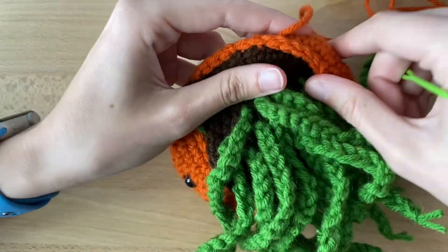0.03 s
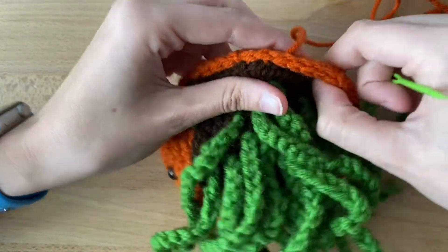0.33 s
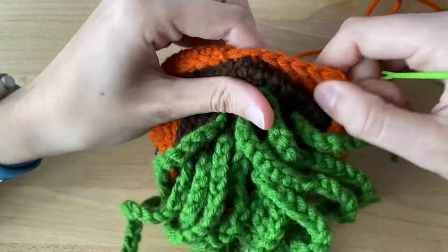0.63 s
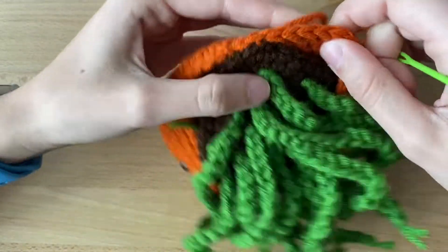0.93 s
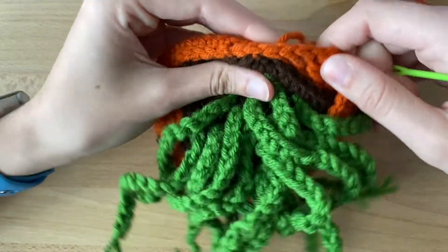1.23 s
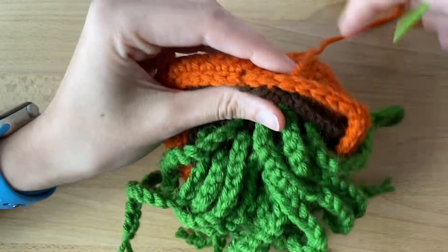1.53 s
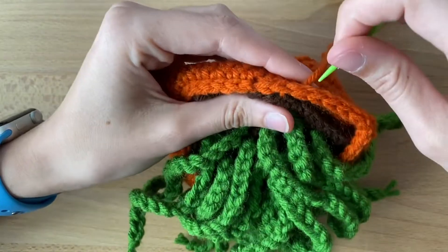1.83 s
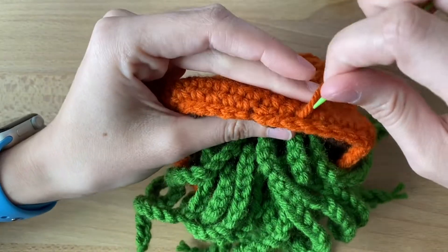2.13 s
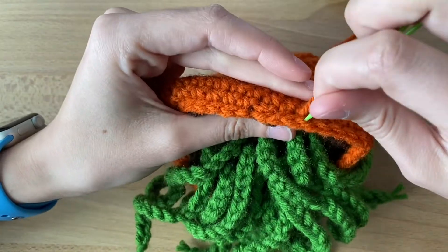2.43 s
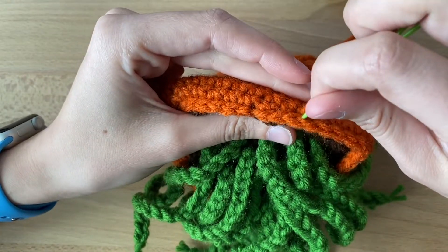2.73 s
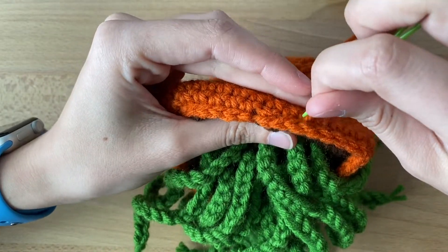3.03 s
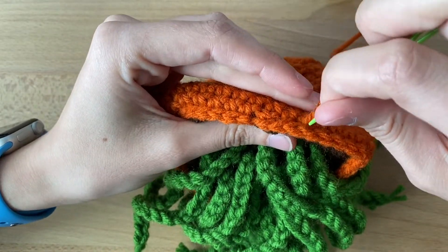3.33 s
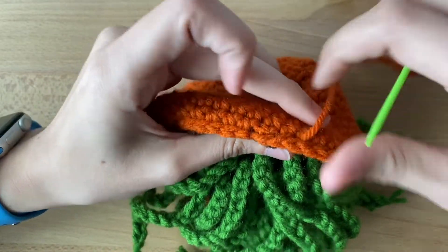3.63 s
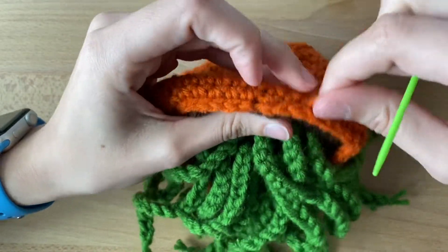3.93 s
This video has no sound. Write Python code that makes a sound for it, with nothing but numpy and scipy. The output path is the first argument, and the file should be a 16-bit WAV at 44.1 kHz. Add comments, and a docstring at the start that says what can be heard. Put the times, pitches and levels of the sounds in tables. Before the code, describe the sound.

Soft, close rubbing of yarn comes in small bursts during hand sewing indoors, with light needle ticks and a brief swish of pulled thread. After a lull the rustling resumes, while a low rumble and fading engine hum lie underneath.

```python
"""Sewing a crocheted toy

Hands sew with a plastic needle at a table, close to two microphones. Yarn rubs on yarn and skin in a
fine crackle, a strand is drawn through with a rasp and a bright swish, and the needle ticks.
Behind them lie a low room rumble and a muffled drone, like an engine outdoors, that sags and fades."""
import sys
import numpy as np
from scipy import signal
from scipy.fft import rfft, irfft
from scipy.io import wavfile
from scipy.ndimage import uniform_filter1d

SR = 44100
rng = np.random.default_rng(int(sys.argv[2]) if len(sys.argv) > 2 else 0)


def put_to_file(sound):
    """Save the sound as 16-bit audio at rate SR, in the file named by the first command-line argument."""
    columns = np.atleast_2d(sound).T  # one column per channel
    safe = np.clip(columns, -1, 1)
    whole_steps = np.round(safe * 32767)
    wavfile.write(sys.argv[1], SR, whole_steps.astype(np.int16))


N = 176400

# how hard the yarn rubs (time [s], relative level [dB], relative treble [dB])
RUB_MOTION = [(0.01, -71.5, -8), (0.08, -78.5, -6), (0.11, -70.5, -11.5), (0.15, -82, -1.5),
              (0.22, -86.5, -1.5), (0.25, -71.5, -6.5), (0.29, -72, -4.5), (0.32, -78.5, -7),
              (0.4, -72.5, -5), (0.45, -76.5, -5.5), (0.5, -71.5, -7), (0.63, -77.5, -8.5),
              (0.67, -69, -4.5), (0.75, -83, -4.5), (0.84, -73, -4), (0.92, -79.5, -5.5), (1.05, -78, -2),
              (1.07, -71, -5), (1.13, -78.5, -2), (1.32, -73.5, -6), (1.34, -72.5, -1), (1.4, -86.5, -9),
              (1.47, -89.5, -3.5), (1.54, -83, -3), (1.57, -75, 2.5), (1.59, -73.5, 5.5), (1.63, -84.5, 0),
              (1.66, -89, 3), (1.68, -81, -7), (1.69, -90, -9), (1.72, -94, -8), (1.83, -89.5, -5),
              (1.94, -80.5, -7), (2.0, -83, -1), (2.08, -80, -7.5), (2.14, -91, -8.5), (3.42, -91, -7.5),
              (3.48, -80.5, -3.5), (3.54, -90.5, -5), (3.58, -87, -14), (3.69, -77.5, 2),
              (3.72, -83.5, -3.5), (3.76, -85, -4), (3.79, -74.5, -1.5), (3.82, -82.5, -3), (3.87, -79, -1),
              (3.92, -88.5, -4), (3.98, -85, -5)]
# tone colour of rubbing yarn (frequency [Hz], relative level [dB])
YARN_COLOUR = [(150, -12.5), (400, -0.5), (700, 4), (1100, -2), (1800, -0.5), (2700, 0.5), (4000, 0),
               (5600, -2), (7200, 1), (10000, -1), (13000, -2.5), (16000, -4.5)]
# scrapes and swishes (loudest at [s], half length [s], centre [Hz], width [Hz], level [dB])
SCRAPES = [(0.278, .015, 3200, 1200, -70.5), (0.281, 0.027, 750, 500, -71.5),
           (0.55, 0.061, 2630, 1500, -81), (0.669, 0.015, 2570, 900, -77), (0.667, .04, 786, 400, -76),
           (.85, 0.046, 2830, 1000, -80.5), (1.588, 0.026, 14800, 3500, -64),
           (2.065, 0.038, 3200, 700, -81), (2.076, .08, 1960, 250, -86), (2.948, 0.017, 7500, 3000, -87),
           (2.951, .018, 14500, 3033, -84), (3.11, 0.017, 2300, 600, -93), (3.457, .025, 6580, 2500, -90),
           (3.485, 0.0021, 11800, 3000, -73.5), (3.593, 0.027, 3830, 1090, -87.5),
           (3.645, 0.027, 2980, 1300, -79.5), (3.7, 0.055, 2380, 695, -83),
           (3.792, 0.023, 2500, 1200, -78.5), (3.86, 0.019, 1680, 220, -81), (3.867, .03, 5530, 1500, -80)]
# the strand sliding through the stitches (time [s], level [dB])
STRAND_LEVEL = [(1.2, -100), (1.28, -83), (1.41, -91), (1.46, -81.5), (1.6, -82.5), (1.66, -79),
                (1.71, -78), (1.738, -79), (1.76, -91), (1.95, -91), (2.07, -89), (2.2, -99), (2.3, -110)]
# tone colour of its rasp (frequency [Hz], relative level [dB])
STRAND_COLOUR = [(500, -28), (1000, -15), (1400, -15), (1600, 3), (1750, -10), (1930, 2), (2200, -20.5),
                 (4000, -30)]
# needle and fingernail ticks (time [s], peak level [dB])
TICKS = [(.279, -56), (.284, -59), (1.274, -58), (1.3368, -46.5), (1.3402, -57), (1.349, -62), (1.423, -71),
         (1.673, -62.5), (1.776, -67), (2.284, -71), (3.106, -73), (3.635, -66), (3.787, -66)]
# the notes in a tick (frequency [Hz], relative level [dB], time to fade by 60 dB [s])
TICK_NOTES = [(620, -12, .06), (790, -4, .024), (980, -4, .015), (1260, -7, .016), (1550, 0, .017),
              (1830, 0, .017), (3100, -6, .006), (3700, -8, .006), (5100, -3, .01), (7200, -6, .005)]
# how alike the hands sound in the two microphones (frequency [Hz], likeness [0-1])
HAND_LIKENESS = [(300, 0.55), (1000, 0.34), (2800, .78), (5500, 0.58), (7000, 1), (16000, 1)]
# how much louder they are on the left (frequency [Hz], left minus right [dB])
HAND_BALANCE = [(300, 4), (700, 9), (2800, 3), (5500, 5.5), (6600, 0), (16000, 0)]
# how far the left wave runs ahead of the right (frequency [Hz], phase [radians])
HAND_PHASE = [(100, 0), (1200, 0), (2800, .8), (4000, .3), (7100, 0), (9100, -3.14), (10900, -6.2),
              (11600, -6.4), (13350, -9.42), (15200, -12.5), (16000, -12.57)]
# the engine's deep note (time [s], pitch [Hz], level [dB])
ENGINE_NOTE = [(0, 48.83, -42.5), (.35, 49.34, -42.5), (.7, 49.52, -43.5), (1.1, 49.02, -46.5),
               (1.5, 47.96, -57), (2, 47.53, -55), (2.5, 47.7, -55.5), (3, 46.43, -59), (3.4, 47.83, -77),
               (4, 48.3, -63.5)]
# its higher tones (loudest at [s], half length [s], pitch [Hz], glide [Hz/s], level [dB], waver [Hz])
ENGINE_TONES = [(0.616, 0.27, 134.5, -2, -52, 1.34), (1.22, 0.2, 131, -1.5, -58, 4.1),
                (.25, 0.31, 205, -7.5, -53, 1.16), (.35, 0.65, 272, -17.5, -61.5, 4.92),
                (0.377, 0.29, 243, -5.5, -61, 6), (1.01, 0.138, 243, -9.5, -50, 3),
                (0.91, 0.089, 210, 0, -56.5, 5.1), (1.178, 0.36, 226, -3.5, -57, 2.2),
                (1.46, .1, 240, -8.5, -53.5, 2.01), (1.655, .25, 63, -1, -56, 3),
                (0.24, 0.39, 475, -5, -70, 1.54), (0.544, 0.27, 335, -10.5, -68, 3.95),
                (3.2, 1, 252.5, -3, -60, 0.61), (2.8, .15, 250, 3.5, -57.5, 4.92),
                (3.6, 0.48, 270, -1, -72.5, 2), (2.65, .35, 372, 0.5, -72, 12), (3.6, .35, 134, 0, -61, 4)]
# tone colours of engine rumble, room rumble and hiss (frequency [Hz], relative level [dB])
ENGINE_COLOUR = [(20, -12.5), (40, -8), (62, 2.5), (85, -7.5), (130, -6), (170, -12), (250, -13),
                 (320, -13.5), (400, -18), (520, -25), (800, -34.5), (1300, -47), (3000, -86)]
ROOM_COLOUR = [(20, -18), (32, -14), (45, -6.5), (58, 1.5), (72, -2), (90, -8.5), (108, -9.5), (127, -4),
               (150, -8), (180, -10.5), (215, -12.5), (255, -10.5), (295, -17), (370, -21), (450, -32),
               (560, -33), (750, -43.5), (1000, -49.5), (1500, -58.5), (4000, -93)]
HISS_COLOUR = [(300, 7), (700, 16.5), (1100, 8.5), (2000, 6), (3500, -1.5), (6000, -9), (8000, -12),
               (10000, -14.5), (13000, -17), (14200, -22), (16000, -23)]
# loudness of the two rumbles (time [s], level [dB])
ENGINE_LEVEL = [(0, -55), (.35, -54), (.8, -56), (1.25, -54), (1.5, -57.5), (2.2, -61.5), (3, -72.5),
                (4, -83)]
ROOM_LEVEL = [(0, -47), (1.5, -59.5), (2.3, -53), (2.8, -54.5), (3.2, -55.5), (4, -56)]
# how alike the background sounds in the two microphones (frequency [Hz], likeness [0-1])
ROOM_LIKENESS = [(30, 1), (70, 0.95), (140, 0.94), (260, 0.61), (450, 0.1), (800, 0.02), (2000, 0),
                 (5000, 0.4), (7000, 0.9), (16000, .95)]


def rubbing(dull_hz=4500, bright_hz=11000, boost_db=3.5, treble_boost_db=5):
    """Yarn crackles as the hands move; a tight, fast strand sounds brighter."""
    hz, times, spectrum = signal.stft(fibres(), SR, nperseg=256)
    level_db, treble_db = over_time(RUB_MOTION, times)
    treble_share = np.clip(np.log((hz + 1) / dull_hz) / np.log(bright_hz / dull_hz), 0, 1)[:, None]
    # random patches of pitch and time are about 1 dB louder or softer
    patches = uniform_filter1d(rng.standard_normal(spectrum.shape), size=7, axis=0)
    patches_db = unit(uniform_filter1d(patches, size=10, axis=1))
    spectrum *= amp(boost_db + level_db + treble_share * (treble_db + treble_boost_db) + patches_db)
    flutter = amp(wander(rate_hz=45))
    return signal.istft(spectrum, SR, nperseg=256)[1][:, :N] * flutter


def fibres(snags_per_s=2500, spread_db=1.5, snag_share=0.36):
    """Yarn fibres slide past each other: countless tiny slips, with larger snags among them."""
    snags = (rng.random((2, N)) < snags_per_s / SR) * rng.choice([-1, 1], (2, N))
    snags = snags * amp(spread_db * np.minimum(rng.exponential(1, (2, N)), 5))
    slips = rng.standard_normal((2, N))
    friction = np.sqrt(snag_share) * unit(snags) + np.sqrt(1 - snag_share) * slips
    return stereo(friction, YARN_COLOUR, HAND_LIKENESS)


def scrapes(t, grit_db=2):
    """Tight yarn scrapes over a fingertip or the needle and rings in one broad band each time."""
    hz = np.fft.rfftfreq(N, 1 / SR)
    friction = rfft(fibres())
    out = np.zeros((2, N))
    for peak_s, half_s, centre_hz, width_hz, db in SCRAPES:
        resonance = 1 / (1 + 2j * (hz - centre_hz) / (1.33 * width_hz)) ** 2
        swell = amp(db) * np.exp(-((t - peak_s) / half_s) ** 2)
        out += swell * unit(irfft(friction * resonance, N))
    return out * amp(grit_db * wander(rate_hz=150))


def strand(t, judder_db=2):
    """The twisted strand judders through the stitches with a narrow rasp."""
    rasp = stereo(rng.standard_normal((2, N)), STRAND_COLOUR, HAND_LIKENESS)
    return rasp * amp(over_time(STRAND_LEVEL, t)[0] + judder_db * wander(rate_hz=200))


def needle(rise_s=.0004, echo_db=-8, echo_s=.13):
    """Needle and fingernail taps ring very briefly, with a little room echo behind them."""
    t = np.arange(SR // 5) / SR
    ticks = np.zeros(N)
    for start_s, peak_db in TICKS:
        detunes = 1 + .015 * rng.standard_normal(len(TICK_NOTES))
        phases = 2 * np.pi * rng.random(len(TICK_NOTES))
        ring = sum(amp(db - 60 * t / fade_s) * np.sin(2 * np.pi * hz * detune * t + phase)
                   for (hz, db, fade_s), detune, phase in zip(TICK_NOTES, detunes, phases))
        ring *= np.minimum(t / rise_s, 1)
        add(ticks, start_s, amp(peak_db) * ring / abs(ring).max())
    tail = rng.standard_normal((2, len(t))) * amp(-60 * t / echo_s)
    echo = signal.fftconvolve(ticks[None], tail / np.linalg.norm(tail[0]), axes=1)[:, :N]
    return ticks + amp(echo_db) * echo


def place_hands(sound):
    """The handwork reaches each microphone with its own loudness and timing."""
    hz = np.fft.rfftfreq(N, 1 / SR)
    left_gain = amp(over_hz(HAND_BALANCE, hz) / 2) * np.exp(.5j * over_hz(HAND_PHASE, hz))
    return irfft(rfft(sound) * np.array([left_gain, 1 / left_gain]), N)


def engine(t, waver_db=1.65):
    """An engine's deep note and wavering higher tones, heard through the walls."""
    deep_hz, deep_db = over_time(ENGINE_NOTE, t)
    out = amp(deep_db) * np.sin(2 * np.pi * np.cumsum(deep_hz) / SR)
    for peak_s, half_s, hz, glide, db, waver_hz in ENGINE_TONES:
        cycles = np.cumsum(hz + glide * (t - peak_s) + waver_hz * wander(rate_hz=7)) / SR
        swell = amp(db + waver_db * wander(rate_hz=7)) * np.exp(-((t - peak_s) / half_s) ** 2)
        # the less alike left and right are, the further their waves are out of step
        phases = np.arccos(over_hz(ROOM_LIKENESS, hz)) * np.array([[.5], [-.5]])
        out = out + swell * np.sin(2 * np.pi * cycles + phases)
    return np.sqrt(2) * out


def background(t, hiss_db=-85):
    """Low rumble from the engine and the room, and a faint steady hiss."""
    rumble, room, hiss = (stereo(rng.standard_normal((2, N)), colour, ROOM_LIKENESS)
                          for colour in (ENGINE_COLOUR, ROOM_COLOUR, HISS_COLOUR))
    rumble *= amp(over_time(ENGINE_LEVEL, t)[0])
    room *= amp(over_time(ROOM_LEVEL, t)[0])
    return rumble + room + hiss * amp(hiss_db)


def stereo(noises, colour, likeness):
    """Gives two unrelated noises a tone colour and blends them into partly alike left and right."""
    hz = np.fft.rfftfreq(N, 1 / SR)
    first, second = rfft(noises)
    alike = over_hz(likeness, hz)
    mid, side = first * np.sqrt(1 + alike), second * np.sqrt(1 - alike)
    return unit(irfft(np.array([mid + side, mid - side]) * amp(over_hz(colour, hz)), N))


def wander(rate_hz):
    """A smooth random wobble of typical size 1; a higher rate makes it quicker."""
    hz = np.fft.rfftfreq(2 * N, 1 / SR)
    spectrum = rfft(rng.standard_normal(2 * N)) * np.exp(-(hz / rate_hz) ** 2)
    return unit(irfft(spectrum))[:N]


def amp(db):
    """Turns decibels into a number to multiply by."""
    return 10 ** (np.asarray(db) / 20)


def unit(x):
    """Scales a signal to an average size (rms) of 1."""
    return x / np.sqrt(np.mean(x ** 2) + 1e-30)


def over_hz(table, hz):
    """Reads a table between its frequencies, with octaves evenly spaced."""
    frequencies, values = np.transpose(table)
    return np.interp(np.log(hz + 1), np.log(frequencies + 1), values)


def over_time(table, t):
    """Reads each value column of a table at the times t."""
    times, *columns = np.transpose(table)
    return [np.interp(t, times, column) for column in columns]


def add(mix, start_s, sound):
    """Adds a sound to the mix at its start time."""
    part = mix[max(round(start_s * SR), 0):][:len(sound)]
    part += sound[:len(part)]


def scene():
    """The handwork in front of the engine and the room."""
    t = np.arange(N) / SR
    handwork = rubbing() + scrapes(t) + strand(t) + needle()
    return place_hands(handwork) + engine(t) + background(t)


def record(dry, cutoff_hz=15750):
    """Cuts away the very highest treble."""
    low_pass = signal.firwin(511, cutoff_hz, window=("kaiser", 9), fs=SR)
    return signal.oaconvolve(dry, low_pass[None], "same")


dry = scene()
out = record(dry)
put_to_file(out)
```